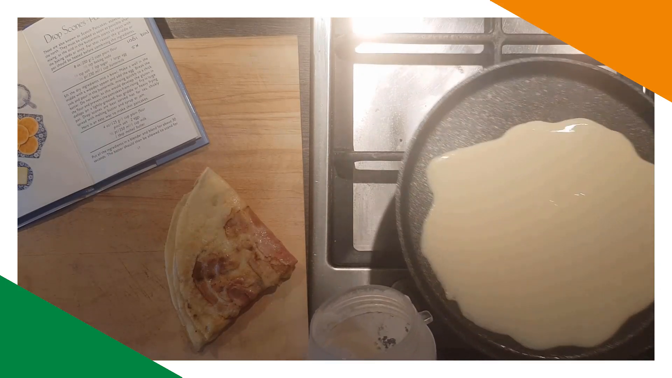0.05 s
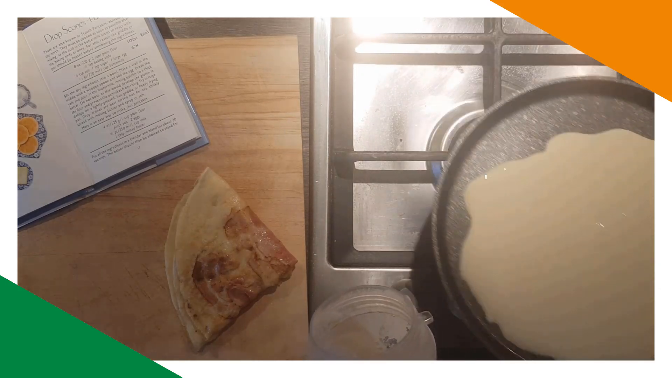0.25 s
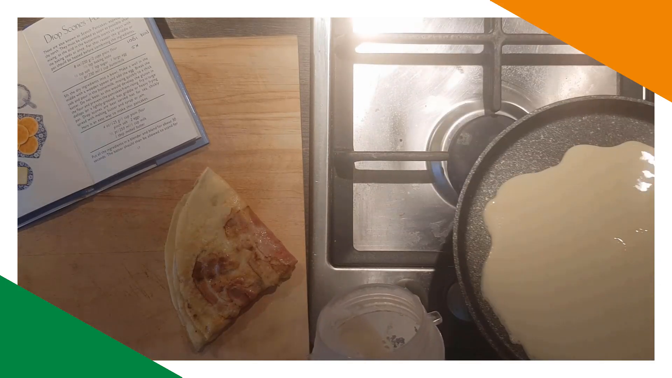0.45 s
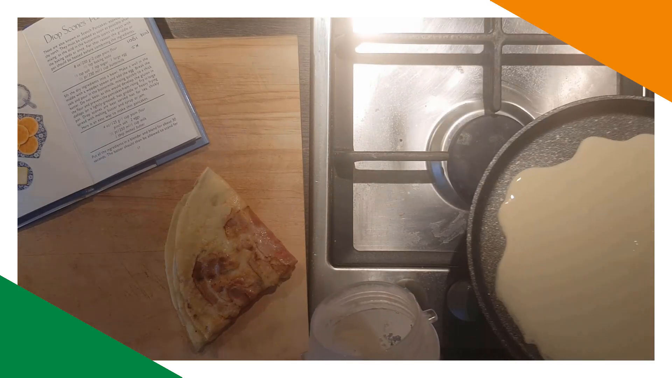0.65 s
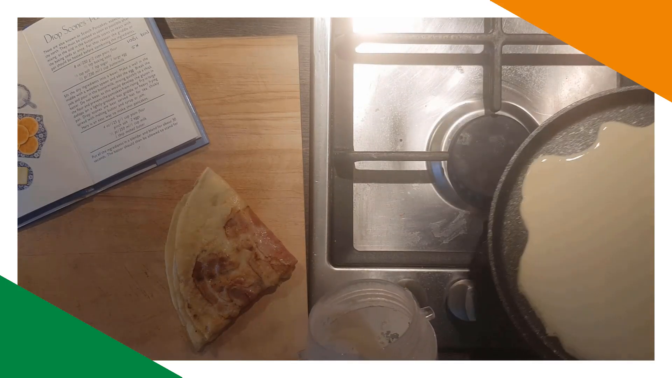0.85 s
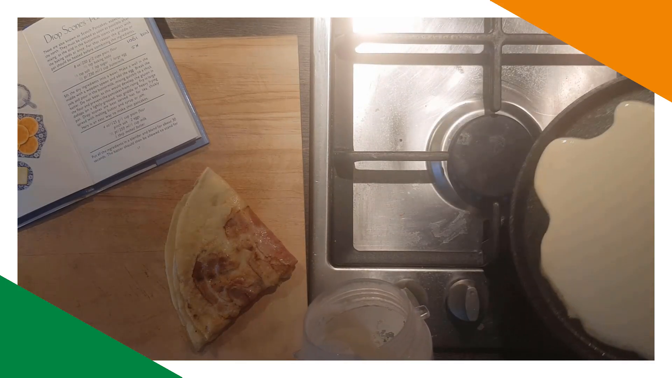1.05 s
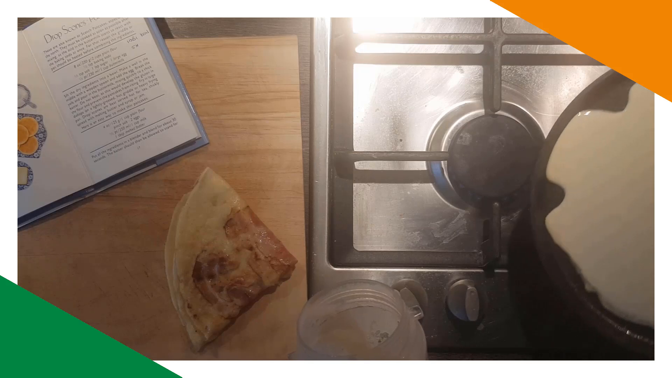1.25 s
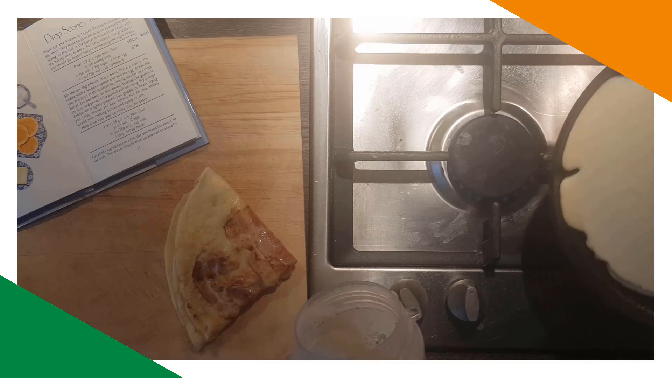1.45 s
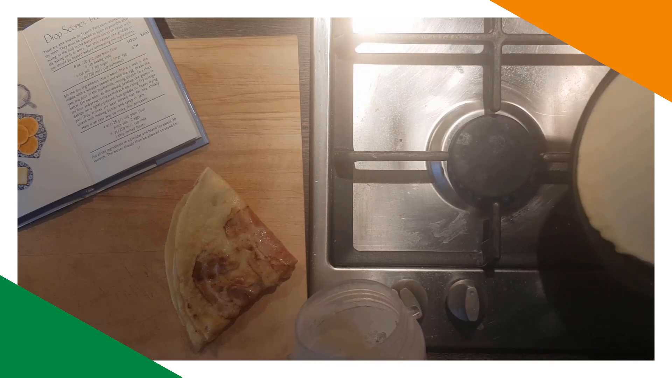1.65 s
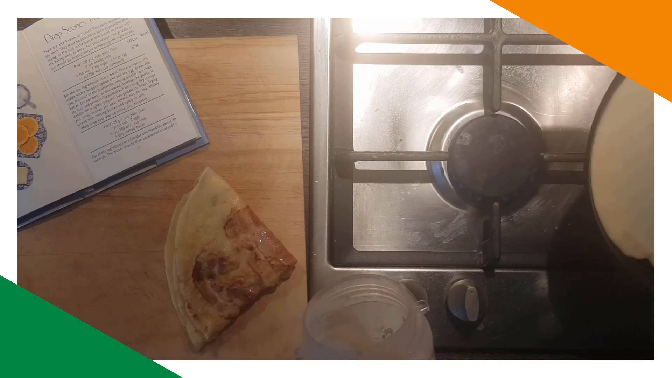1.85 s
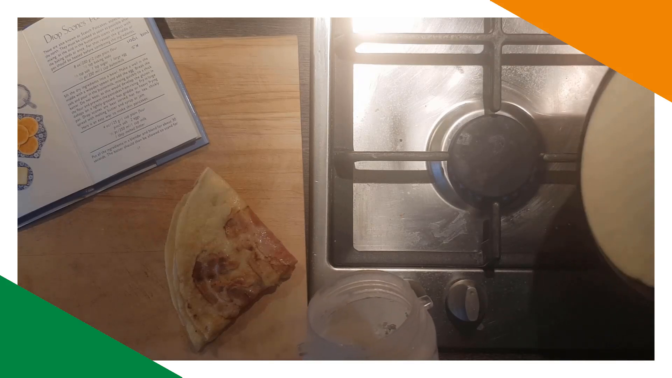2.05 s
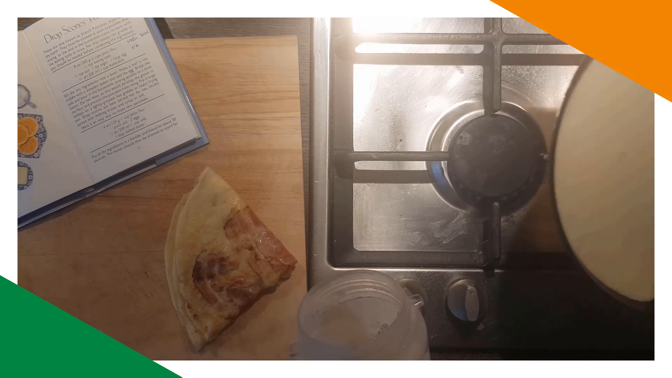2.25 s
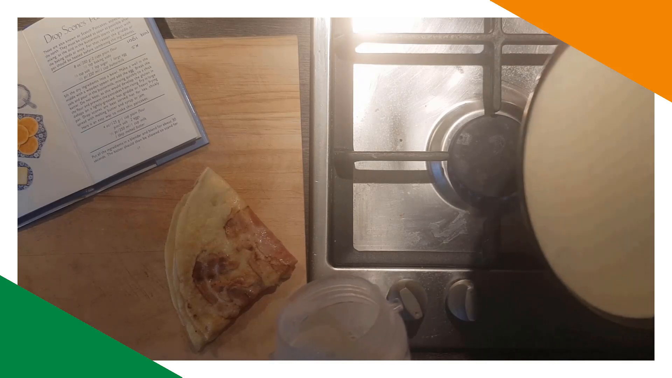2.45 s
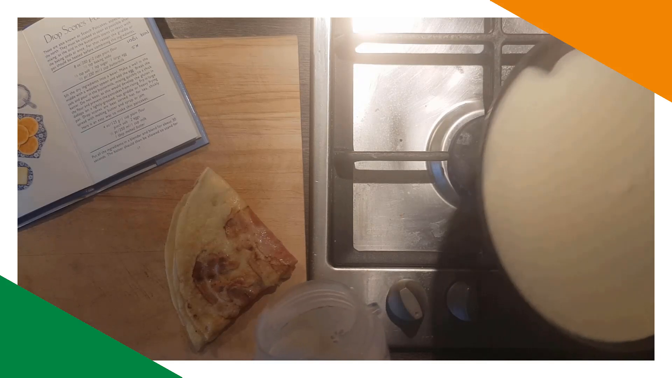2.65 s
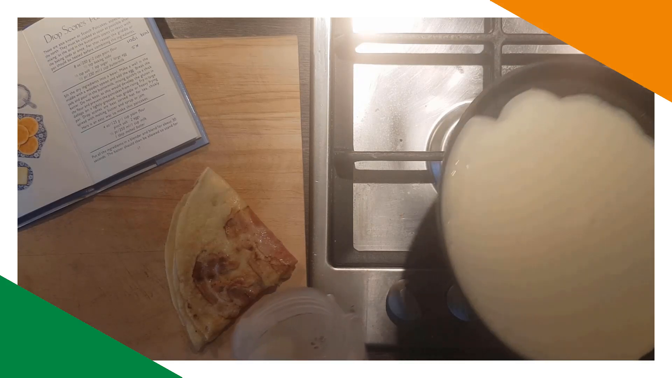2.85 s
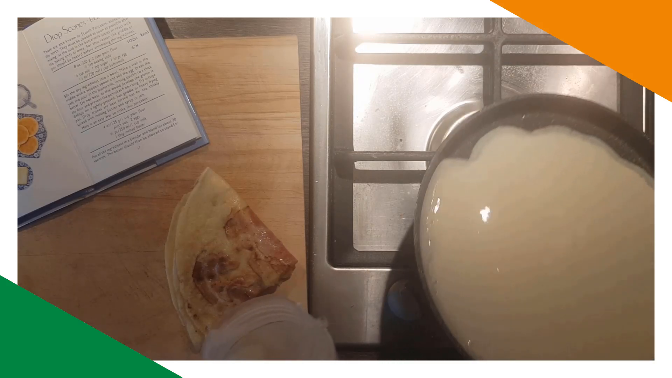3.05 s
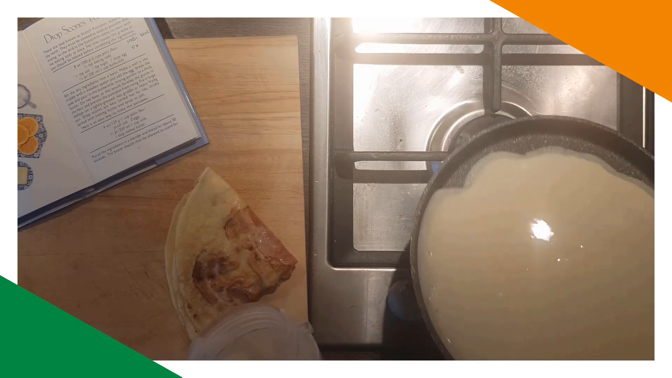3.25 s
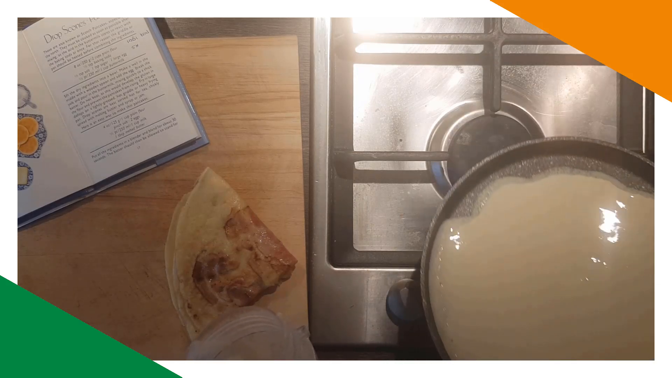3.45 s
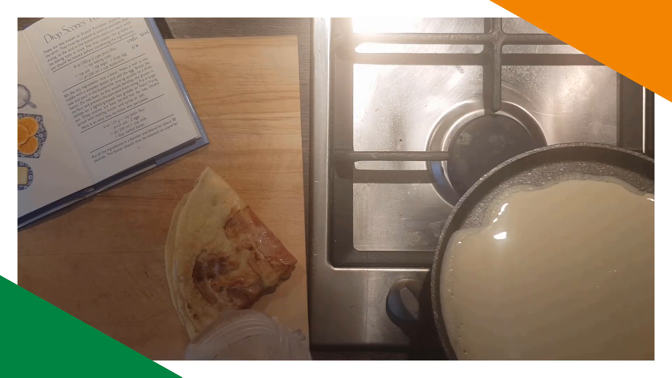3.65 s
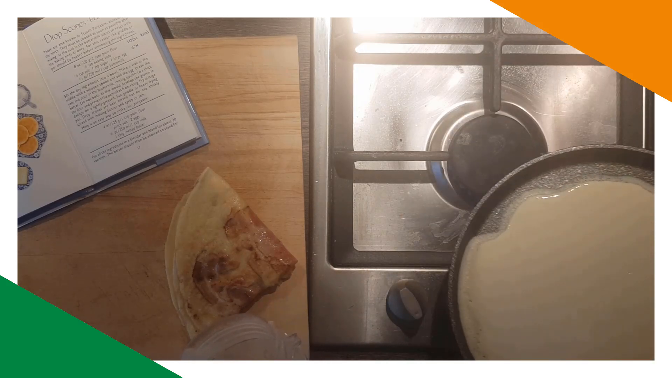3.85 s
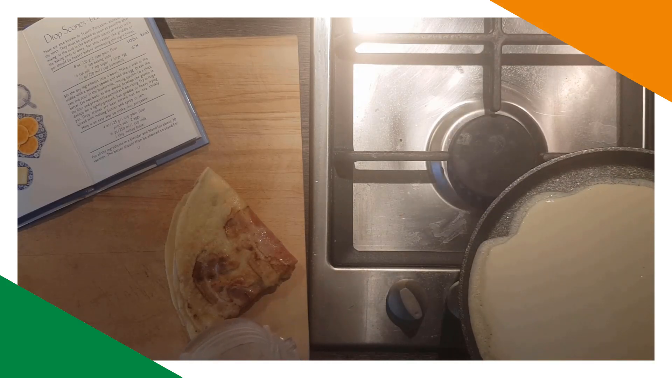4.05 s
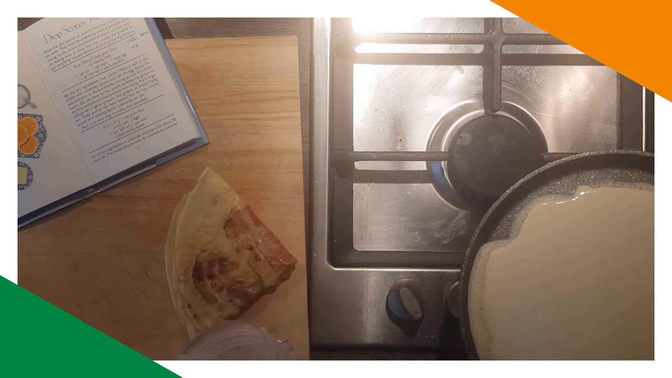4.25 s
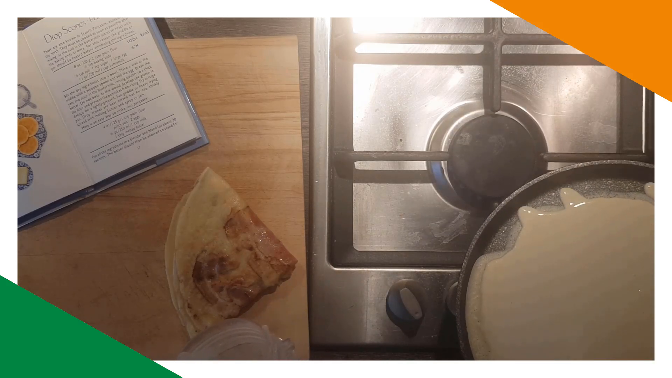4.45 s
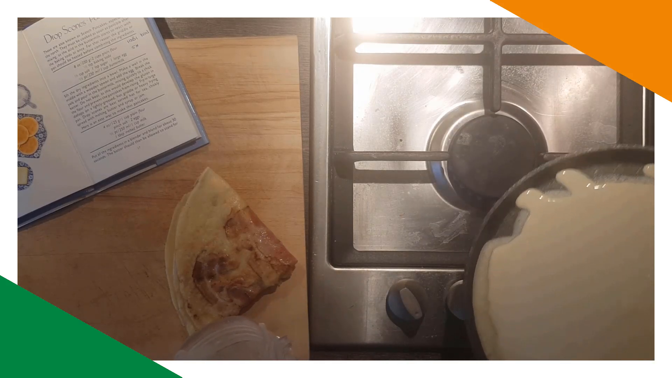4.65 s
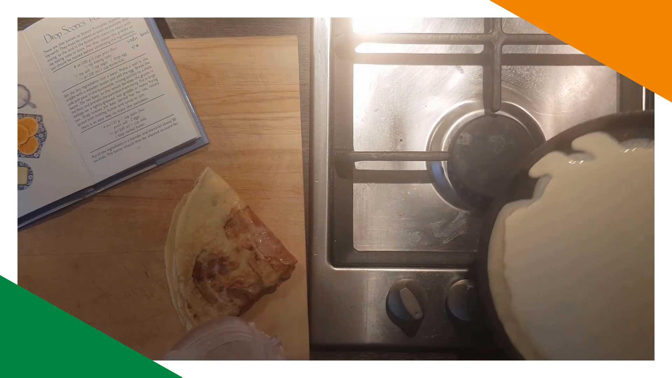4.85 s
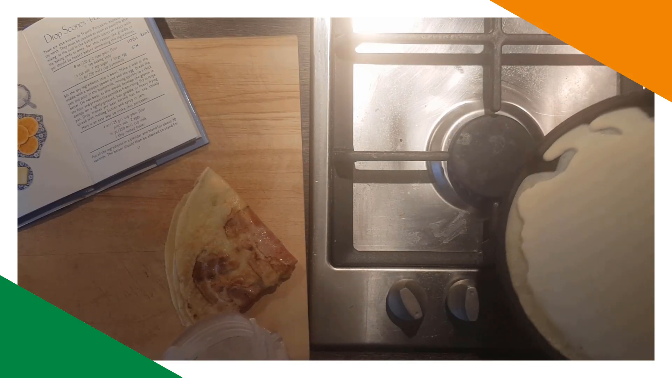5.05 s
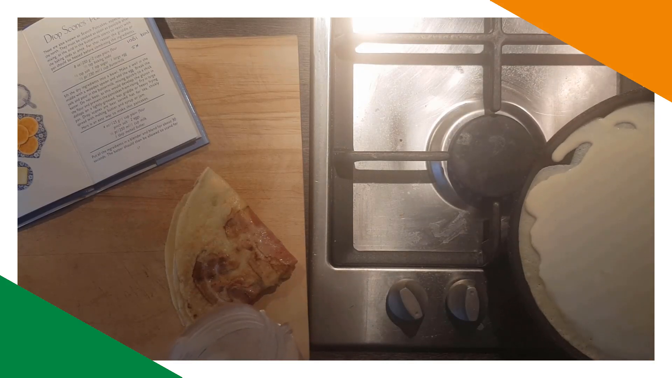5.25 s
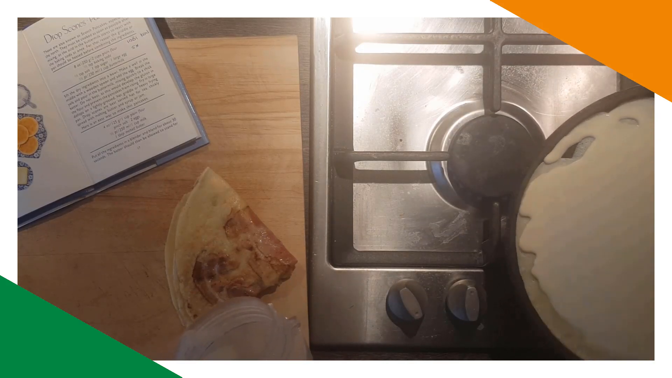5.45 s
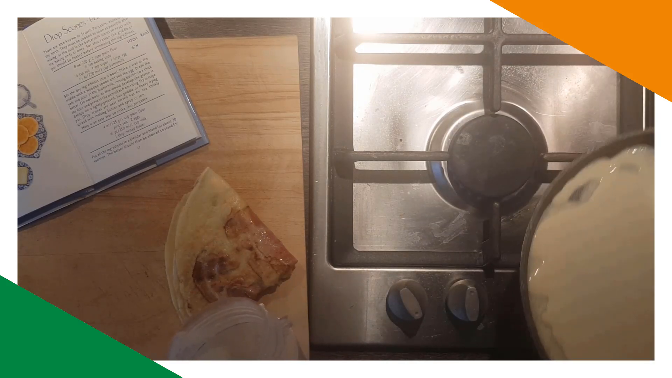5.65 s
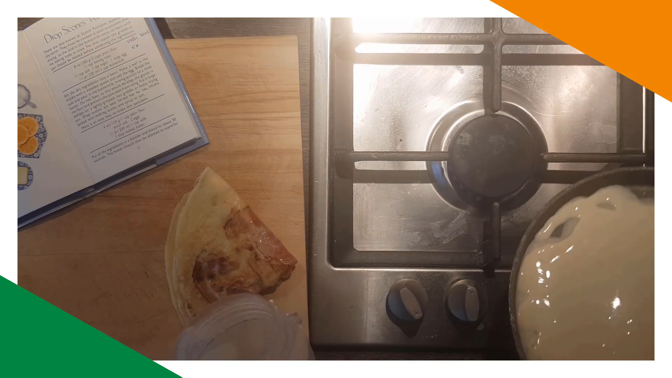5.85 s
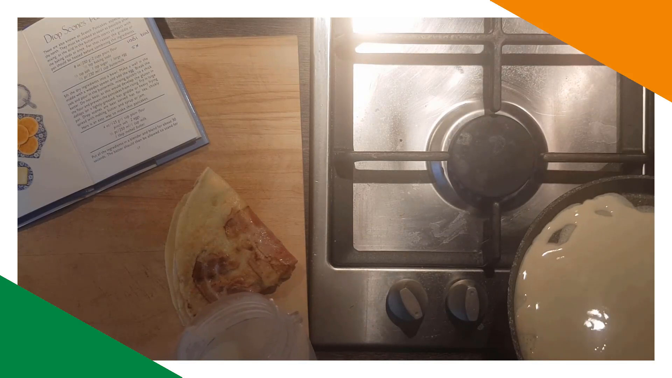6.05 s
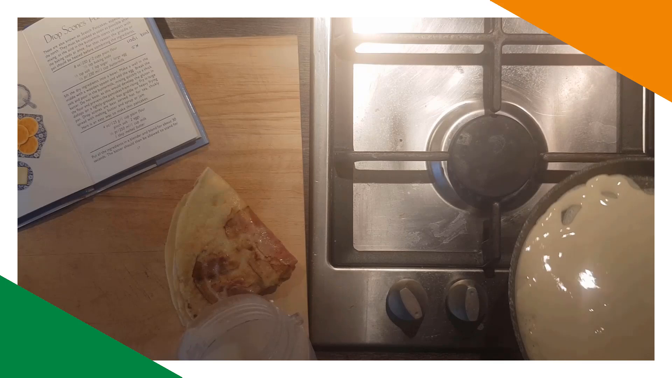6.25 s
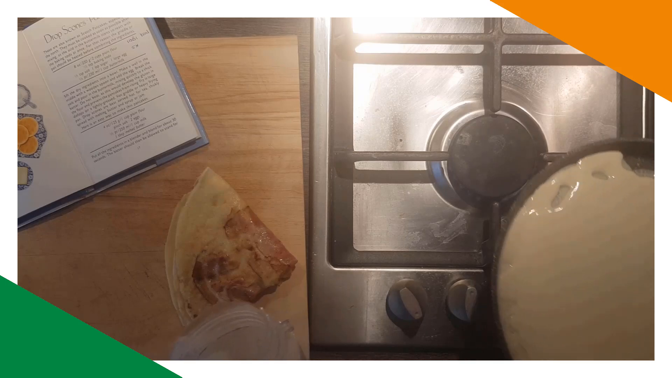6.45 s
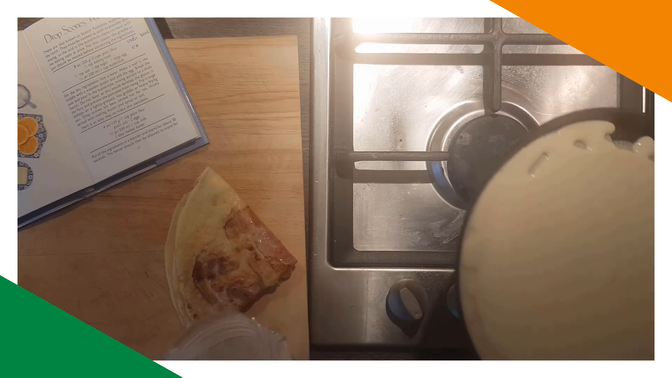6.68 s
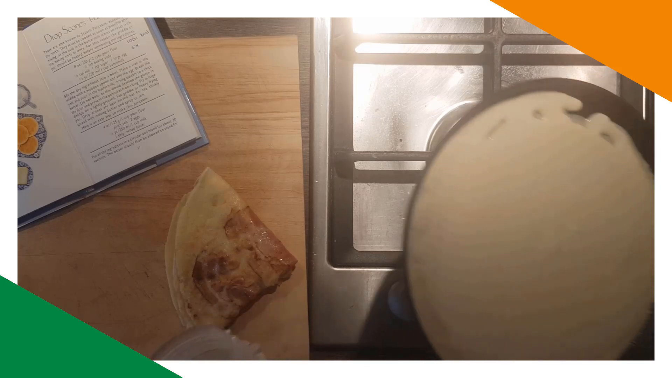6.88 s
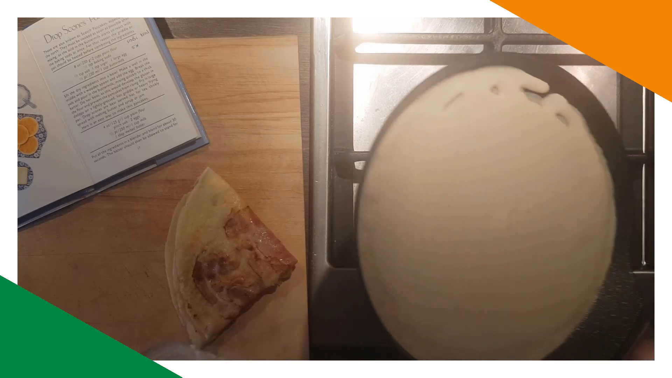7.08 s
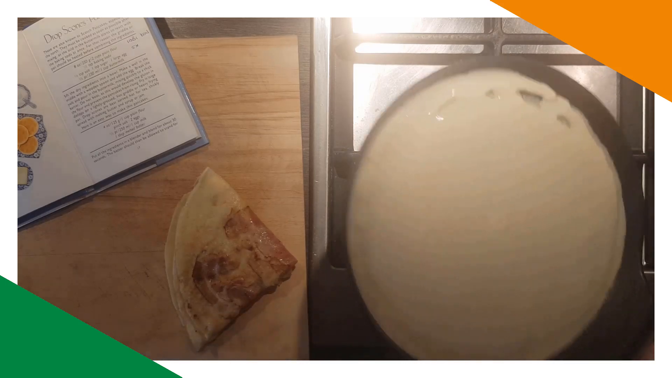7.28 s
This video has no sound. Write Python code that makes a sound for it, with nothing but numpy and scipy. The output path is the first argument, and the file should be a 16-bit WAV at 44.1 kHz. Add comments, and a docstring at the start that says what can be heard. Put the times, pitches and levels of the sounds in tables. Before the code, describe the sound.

Wet pancake batter hisses and spits sharply in a swirled pan, dying away to sparse ticks above a soft, rapidly pulsing burner.

```python
"""A loud, dense sizzle comes first: steam bubbles burst under pancake batter in a hot pan, dying as it cools.
Five bands of random clicks make the sizzle; single spits are short, decaying bursts of grainy noise.
The pan is lifted and swirled over a lit gas ring, so drifting echoes shift the colour of its sound.
The uncovered flame flickers: trains of low pops, over a hush of shaped noise that swells with the flicker.
A faint, wavering hum of sine and narrow noise sounds briefly about two seconds in."""
import sys
import numpy as np
from scipy import signal
from scipy.fft import rfft, irfft, next_fast_len
from scipy.io import wavfile

SR = 44100
rng = np.random.default_rng(int(sys.argv[2]) if len(sys.argv) > 2 else 0)


def pcm_store(signal):
    """Save signal as 16-bit PCM."""
    levels = np.round(np.clip(np.atleast_2d(signal), -1, 1) * 32767)
    wavfile.write(sys.argv[1], SR, levels.astype(np.int16).T)


def level_to_linear(level):
    """Convert decibel levels to linear amplitude factors, elementwise."""
    exponent = np.asarray(level, float) / 20
    return 10 ** exponent


N = 322812   # samples

# spectrum of room air and flame roar: frequency_hz, relative_density_db
HUSH_SPECTRUM = [(12, -7.5), (27, 6), (40, -6), (52, -3), (70, -9.5), (129, 1), (232, -11), (350, -9.5),
                 (480, -15.5), (550, -21.5), (600, -13), (660, -20.5), (800, -21.5), (1200, -24.5),
                 (1600, -44), (2600, -110)]
# phase of each flame tongue against the steady beat: time_s, ahead_flickers
FIRST_TONGUE_PHASE = [(0, -.1), (.2, -.05), (.4, -.12), (.6, -.02), (.75, -.04), (1.25, -.24), (1.75, -.38),
                      (2.0, -.34), (2.3, -.22), (2.6, -.25), (2.95, -.36), (3.1, -.3), (3.3, -.07),
                      (3.55, 0), (3.72, .07), (4.0, -.12), (4.5, -.2), (4.75, -.13), (5.0, 0), (5.25, .06),
                      (5.5, .15), (5.72, .04), (6.0, .11), (6.4, .18), (7.05, .15), (7.32, -.1)]
SECOND_TONGUE_PHASE = [(0, .03), (.4, 0), (.85, 0), (1.1, .07), (1.35, .22), (1.75, .34), (2.0, .37),
                       (2.35, .34), (2.6, .26), (3.0, .22), (3.25, .05), (3.45, .02), (4.0, -.68),
                       (4.37, -1.18), (4.5, -1.3), (5.0, -1.83), (5.4, -1.76), (5.7, -1.58), (6.0, -1.45),
                       (6.2, -1.53), (6.45, -1.42), (6.75, -1.5), (7.0, -1.65), (7.32, -1.72)]
WEAK_TONGUE_PHASE = [(0, -.3), (1.0, -.43), (1.6, -.62), (2.3, -.8), (3.0, -.9), (4.05, -.65), (4.6, -.67),
                     (5.25, -1.07), (6.0, -1.0), (6.5, -1.2), (6.85, -1.65), (7.32, -2.1)]
# the loudest spits, before grain and filters: start_s, peak_db, treble_db, body_db (both against peak), t60_s
LOUD_SPITS = [(2.515, -20, -15, -7, .025), (2.596, -23, -14, -7, .025), (2.698, -22, -12, -7, .025),
              (3.0126, -27, -4, -7, .025), (1.6841, -24, -3, -10, .015), (3.1542, -28, -3, -12, .015),
              (3.3737, -32, -3, -12, .015), (3.4445, -35, -1, -5, .02), (3.5628, -24.5, -6, -9, .025),
              (3.621, -32, -1, -6, .02), (3.68, -34, 0, -6, .025), (3.821, -31, 0, -7, .025),
              (3.893, -37, -2, -3, .02), (3.937, -35, -8, -3, .02), (4.1583, -37, -14, -1, .025),
              (4.226, -36, -3, -1, .035), (4.572, -36, -4, -2, .03), (4.7391, -34, -1, -5, .018),
              (4.78, -34, -4, -4, .035), (4.833, -34, -2, -4, .025), (4.912, -38, -1, -4, .05),
              (5.0384, -39, -1, -3, .02), (5.0658, -31, -4, -7, .015), (5.1986, -34, -9, -6, .03),
              (5.217, -33, -4, -6, .03), (5.246, -32, -3, -7, .025), (5.3148, -38, -2, -4, .045),
              (5.45, -38, -1, -5, .025), (5.5936, -38, -1, -5, .02), (5.612, -36, 0, -5, .025),
              (5.6665, -39, -1, -6, .02), (5.7743, -33.5, -2, -8, .018), (5.8517, -32.5, -3, -6, .028),
              (5.9503, -42, -6, -2, .02), (6.0262, -39.5, -12, -2, .025), (6.0717, -36, -1, -4, .018),
              (6.0845, -35.5, -3, -4, .045), (6.1623, -42, -1, -6, .02), (6.225, -44, 1, -8, .02),
              (6.4302, -42, -1, -6, .02), (6.608, -43, -1, -5, .02), (6.76, -42, 0, -5, .02),
              (6.8014, -42, -2, -1, .025), (7.048, -43, -1, -4, .02)]
# boiling and the tilted pan's 5 kHz ring: time_s, level_db, largest_bubbles_db, ring_db
BOIL_CURVE = [(0.0, -37, -11, 0), (0.83, -42, -8, 2), (1.16, -39, -13, -0.5), (1.3, -38, -9.5, 1.5),
              (1.51, -39, -11.5, -5), (1.53, -37, -14, -5), (1.81, -38, -11.5, -3), (2.16, -35, -15, -2),
              (2.32, -36, -14, -0.5), (2.47, -36, -11.5, 2.5), (2.7, -36.5, -12, 2.5),
              (3.0, -40.5, -11, 2.5), (3.32, -44, -12, 3.5), (3.34, -47, -9, -0.5), (4.42, -51.5, -6, -1),
              (5.32, -50.5, -10, 1), (5.38, -53.5, -8, -2), (5.84, -53.5, -10.5, 1), (5.93, -59, -6.5, 3),
              (6.22, -58.5, -10, -2), (6.5, -58, -7, 0), (6.72, -57.5, -5, 0), (6.8, -57.5, -5.5, -4),
              (6.95, -56, -6, 4), (7.02, -57, -6.5, -1), (7.2, -58, -5.5, 2), (7.32, -59, -5.5, -1)]
# bubble sizes: low_hz, high_hz, level_against_boil_db, coarseness_factor, common_clump_factor, own_flicker_db
BUBBLE_SIZES = [(388, 1590, -12, 0.65, 0.9, 0.2), (1533, 2520, -7, 1.0, 0.67, -1.4),
                (2454, 4385, -3, 0.53, 0.24, -0.95), (4350, 7420, -2.5, -0.085, 0.31, -0.1),
                (5980, 16000, -1, -0.38, 0.2, 0.53)]
# the tilting pan faces the right microphone more or less: time_s, coarse_gain_db, ring_gain_db
PAN_FACING = [(0, -.5, 2.5), (.7, -0.5, -3), (1.7, -0.5, -4), (2.2, 0, 2.5), (2.8, 0.5, 1), (3.5, 0, 0),
              (4.7, -0.5, 0), (5.7, -1, -3), (6.5, -2.5, -1), (7.32, -3, -1)]
# colour of the sizzle at each microphone: frequency_hz, left_relative_db, right_relative_db
SIZZLE_COLOUR = [(390, -24, -18.5), (700, -21.5, -29.5), (935, -15.5, -20.5), (1180, -13, -19.5),
                 (1325, -6.5, -12), (1530, -8, -13.5), (1846, -4.5, -12), (2360, -6, -8), (2680, -5, -7),
                 (3150, -3.5, -10.5), (3470, -5, -10), (3800, -7, -8.5), (4120, -3.5, -5),
                 (4420, 0.5, -3.5), (5010, 2.5, -1.5), (5600, 2.5, -7.5), (5960, 1, -8.5), (6970, -6, -2.5),
                 (7600, -6.5, -9.5), (8870, -9, -3.5), (11100, -3.5, -9), (12600, -6.5, -7.5),
                 (14400, -7, -10.5), (15600, 1.5, -16), (16200, -45, -51)]
# likeness of the two microphones, negative where they move in opposition: frequency_hz, likeness (-1 to 1)
SIDE_LIKENESS = [(500, 0.69), (780, 0.32), (930, -0.89), (1050, .15), (1400, 0.62), (1700, -0.081),
                 (2050, -0.23), (2350, 0.18), (2650, 0.67), (3000, -0.044), (3400, 0.32), (3900, -0.026),
                 (4500, -0.31), (5100, 0.3), (6000, 0.029), (7000, -0.075), (9000, 0.065)]

FLICKERS_PER_S = 14.46


def rms_one(x):
    """Normalisation: scale to unit rms."""
    return x / np.sqrt(np.mean(x ** 2) + 1e-20)


def in_time(rows):
    """Linear interpolation: columns of a curve table at every sample."""
    s, *columns = np.transpose(rows)
    return [np.interp(np.arange(N) / SR, s, column) for column in columns]


def at_hz(points, hz):
    """Spectral interpolation on a logarithmic frequency axis."""
    table_hz, values = np.transpose(points)
    return np.interp(np.log(hz + 1), np.log(table_hz + 1), values)


def coloured(x, points):
    """Linear filtering: multiply the spectrum by a gain in dB."""
    size = next_fast_len(N + 4096)
    hz = np.arange(size // 2 + 1) * SR / size
    return irfft(rfft(x, size) * level_to_linear(at_hz(points, hz)), size)[..., :N]


def band(x, low_hz, high_hz):
    """Butterworth band-pass filtering."""
    return signal.sosfilt(signal.butter(2, [low_hz, high_hz], "band", fs=SR, output="sos"), x)


def drift(rate_hz):
    """Low-passed chance: white noise through two equal poles, of unit rms."""
    r = np.exp(-40 * np.pi * rate_hz / SR)   # one step every 20 samples
    white = rng.standard_normal(N // 20 + 2002)
    slow = signal.lfilter([1], [1, -2 * r, r * r], white)[2000:]
    return np.interp(np.arange(N) / 20, np.arange(len(slow)), rms_one(slow))


def flickers(ahead):
    """Phase accumulation: the running count of a tongue's flickers, never falling."""
    return np.maximum.accumulate(FLICKERS_PER_S * np.arange(N) / SR + ahead)


def hush():
    """Broadband turbulence: flame roar and room air, swelling with the flicker."""
    mid, side = rng.standard_normal((2, N))
    # weakest difference, hence most alike in the two ears, around 450 Hz
    side = coloured(side, [(30, -4.0), (65, -5.0), (130, -6), (250, -4.5), (450, -7), (700, 0),
                           (930, 0.0), (1300, 5)])
    air = coloured(np.array([mid + side, mid - side]), HUSH_SPECTRUM)
    air[0] = coloured(air[0], [(150, -4.5), (400, 2.5), (800, 2.5)])   # the bass leans right
    cycles = flickers(in_time(FIRST_TONGUE_PHASE)[0])
    swell_db = 1.8 * np.cos(2 * np.pi * (cycles - .15))
    return level_to_linear(-58.5 + swell_db) * rms_one(air)


def hum():
    """Narrow-band tone: a frequency-modulated sine with a noise band around it, stronger on the left."""
    centre_hz, half_width_hz = 583, 14.5
    from_s, to_s, fade_s = 1.6, 2.48, .08
    s = np.arange(N) / SR
    noise = rms_one(band(rng.standard_normal(N), centre_hz - half_width_hz, centre_hz + half_width_hz))
    phase = 2 * np.pi * np.cumsum(centre_hz + 8 * drift(6)) / SR
    sine = np.sqrt(2) * np.sin(phase)
    on = np.clip(np.minimum(s - from_s, to_s - s) / fade_s + .5, 0, 1)
    level_db = -64 + 1.5 * drift(5.8)
    return on * level_to_linear(level_db) * (0.8 * sine + 0.65 * noise) * np.array([[1.2], [.75]])


def flame():
    """Pulsating combustion: four tongues flicker side by side in suction pops; the hob echoes them inverted."""
    strong_chance, weak_chance = 0.96, .6   # share of flickers that pop
    strong_db, weak_db = -45.5, -51         # typical pulse before its shape and filter
    stray = rng.random() + .4 * drift(.3)   # the fourth tongue wanders, in flickers
    tongues = [(in_time(FIRST_TONGUE_PHASE)[0], strong_chance, strong_db),
               (in_time(SECOND_TONGUE_PHASE)[0], strong_chance, strong_db),
               (in_time(WEAK_TONGUE_PHASE)[0], weak_chance, weak_db),
               (stray, weak_chance, weak_db)]
    whole = np.arange(-2, int(FLICKERS_PER_S * N / SR) + 3)
    train = np.zeros(N)
    for ahead, chance, pulse_db in tongues:
        luck, wobble = rng.random(len(whole)), rng.standard_normal((len(whole), 2))
        at = np.searchsorted(flickers(ahead), whole + 0.012 * wobble[:, 0])
        heard = (luck < chance) & (at > 0) & (at < N)
        train[at[heard]] -= level_to_linear(pulse_db + 1.34 * wobble[heard, 1])   # negative: suction
    t = np.arange(-200, 900) / SR
    pop = np.exp(-(t / 0.00075) ** 2) - 0.4 * np.exp(-((t - .0041) / 0.001) ** 2)
    push = np.exp(-(t / 0.0011) ** 2) - 0.6 * np.exp(-((t - .0045) / 0.002) ** 2)
    # the burner cap rings briefly
    onset = (t > 0) * (1 - np.exp(-(t / 0.00059) ** 2))
    ring = onset * np.cos(2 * np.pi * 350 * t) * level_to_linear(-60 * t / 0.046)
    # the right ear gets the low push as well
    shapes = np.array([0.97 * pop + 0.18 * ring, 0.85 * pop + 0.17 * ring + 0.34 * push])
    pops = signal.fftconvolve(train[None], shapes, axes=1)[:, 200:200 + N]
    return band(pops, 28, 1170)


def small_spits():
    """Poisson-like chance: small spits come more often as the boil thins out."""
    boil_db = in_time(BOIL_CURVE)[0]
    per_s = 22.0 * np.exp(.07 * (-38 - boil_db))   # 22 a second at a hard boil of -38 dB
    luck, vary = rng.random(N), rng.uniform(-1.1, 1, (N, 4))
    rows = []
    for i in np.flatnonzero(luck < per_s / SR):
        peak, treble, body, decay = vary[i]
        rows.append((i / SR, boil_db[i] + 8 + 4 * peak, -4 + 5 * treble, -5 + 4 * body,
                     .008 * (1 + .5 * decay)))
    return rows


def spits():
    """Impulsive radiation: single larger bubbles, each a snap and a broad, grainy crackle that decay."""
    shapes, t = np.zeros((3, N + SR)), np.arange(SR // 10) / SR
    for s, peak_db, treble_db, body_db, t60 in LOUD_SPITS + small_spits():
        i = round(s * SR)
        crackle = level_to_linear(-3 - 60 * t / t60)
        snap = level_to_linear(-3 - 60 * t / .005)
        levels_db = peak_db + np.array([[0], [treble_db], [body_db]])
        shapes[:, i:i + len(t)] += level_to_linear(levels_db) * (crackle + snap)
    grain_db = 3 * rng.standard_normal(N)
    grains = rms_one(rng.standard_normal((2, N)) * level_to_linear(grain_db))
    crack, fine, body = shapes[:, None, :N] * grains
    out = band(crack, 4430, 7280) + band(fine, 5860, 13200) + band(body, 1440, 3940)
    return out * level_to_linear([[1.75], [-1.75]])   # 3.5 dB towards the left


def sputter(per_s, t60):
    """Relaxation: sudden flare-ups of boiling that die away, as a modulation of unit rms."""
    r = level_to_linear(-60 / (t60 * SR))
    starts = (rng.random(N) < per_s / SR) * rng.uniform(0.79, 1, N)
    flares = signal.lfilter([1], [1, -r], starts)
    return rms_one(flares - flares.mean())


def bursts(per_s, spread_db, clump_db):
    """Shot noise: clumped clicks of uneven size, shared by both ears but each with its own sign."""
    born = rng.random(N) < per_s / SR
    sizes = level_to_linear(spread_db * np.minimum(rng.exponential(1, N), 4.3) + clump_db)
    return rms_one(born * sizes * rng.choice([-1, 1], (2, N)))


def nearby_echoes(clicks, t60, wet_db):
    """Diffuse scattering: pan walls, hob and tiles spread clicks into noise, unlike in the two ears."""
    r = level_to_linear(-120 / (t60 * SR))   # decay of energy, hence twice 60
    energy = signal.lfilter([1 - r], [1, -r], clicks ** 2)
    return clicks + level_to_linear(wet_db) * np.sqrt(energy) * rng.standard_normal((2, N))


def microphones(x):
    """Coherence: the right shares part of what the left hears, then each side colours the pan's sound."""
    size = next_fast_len(N + 4096)
    f = np.arange(size // 2 + 1) * SR / size
    left, right = rfft(x, size)
    alike = np.clip(at_hz(SIDE_LIKENESS, f), -.95, .95)
    right = alike * left + np.sqrt(1 - alike ** 2) * right
    hz, left_db, right_db = np.transpose(SIZZLE_COLOUR)
    gains = [level_to_linear(at_hz(np.transpose([hz, db]), f)) for db in (left_db, right_db)]
    return irfft(np.array([left, right]) * gains, size)[:, :N]


def sizzle():
    """Bubble noise: bubbles of five sizes burst, each size in its own band; clumps are partly shared."""
    boil_db, coarse_db, ring_db = in_time(BOIL_CURVE)
    right_coarse_db, right_ring_db = in_time(PAN_FACING)
    right = np.array([[0], [1]])
    shared_db = 0.35 * drift(9.1) + .5 * drift(37) + 0.45 * sputter(40, t60=0.045)
    common = bursts(3500, 3.7, shared_db)
    out, surge = 0, drift(4.8)
    for low_hz, high_hz, level_db, coarse, follows, own_db in BUBBLE_SIZES:
        surge_db = .14 * low_hz / 1000 * surge   # finer bubbles surge more
        own = bursts(9000, 2.15, follows * shared_db + own_db * drift(25) + surge_db)
        heard = microphones(nearby_echoes(0.65 * common + 0.74 * own, t60=0.034, wet_db=-1.5))
        coarseness_db = coarse_db - coarse_db.mean() + right * right_coarse_db
        gain_db = boil_db + level_db + coarse * coarseness_db
        out = out + level_to_linear(gain_db) * rms_one(band(band(heard, low_hz, high_hz), low_hz, high_hz))
    ring_gain = level_to_linear(ring_db + right * right_ring_db)
    return out + (ring_gain - 1) * band(out, 4700, 5540)


def swirled(x, echo_db, wander_s):
    """Comb filtering: echoes off rim, hob and wall change their paths as the pan is swirled."""
    out = x.copy()
    for ear in range(2):
        for lag_s in np.geomspace(.0008, .009, num=7) * rng.uniform(.85, 1.15, size=7):
            lag = (lag_s + wander_s * drift(.35)) * SR
            source = np.clip(np.arange(N) - lag.astype(int), 0, N - 1)
            out[ear] += level_to_linear(echo_db) * rng.choice([-1, 1]) * x[ear, source]
    return out / np.sqrt(1 + 7 * level_to_linear(echo_db) ** 2)


def scene():
    """Superposition: the swirled pan above, flame, hush and hum below."""
    pan = swirled(sizzle() + spits(), echo_db=-17, wander_s=.0003)
    return pan + flame() + hush() + hum()


def top_cut(x):
    """Nothing passes above the cut-off."""
    return signal.sosfilt(signal.butter(12, 16610, fs=SR, output="sos"), x)


def record(dry):
    """Band limitation: the top is cut by 60 dB from 16 kHz, and a small constant offset is added."""
    limited = signal.sosfilt(signal.cheby2(16, 60, 16000, fs=SR, output="sos"), dry)
    mix = limited - .0006
    return top_cut(mix)


dry = scene()
out = record(dry)
pcm_store(out)
```